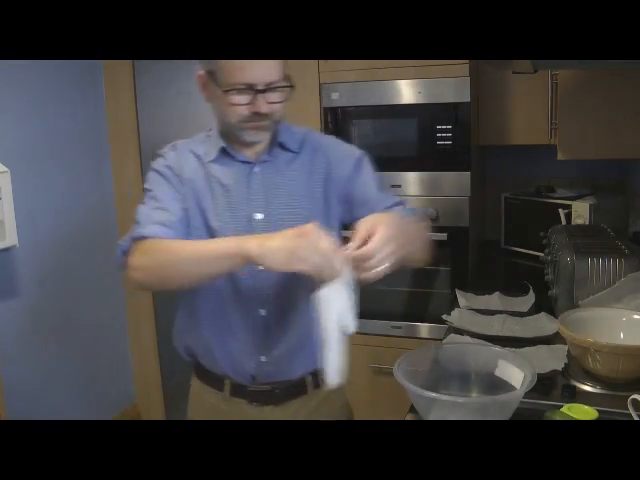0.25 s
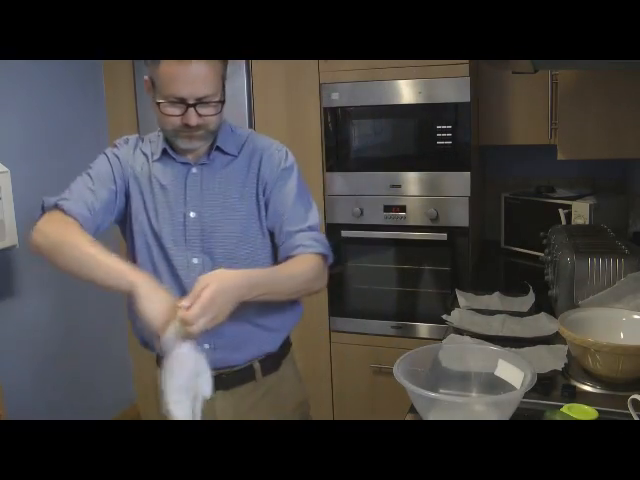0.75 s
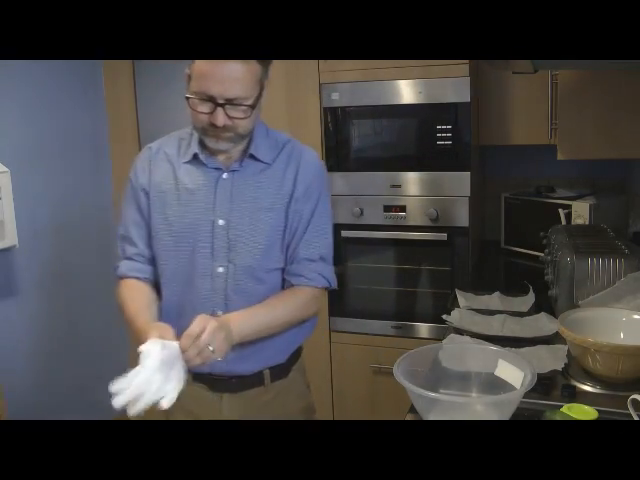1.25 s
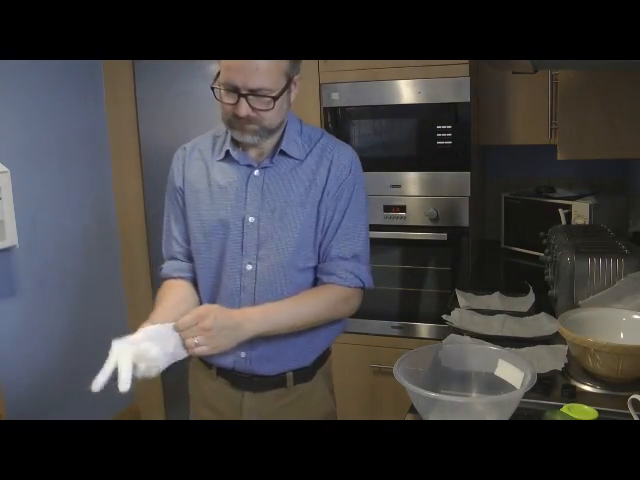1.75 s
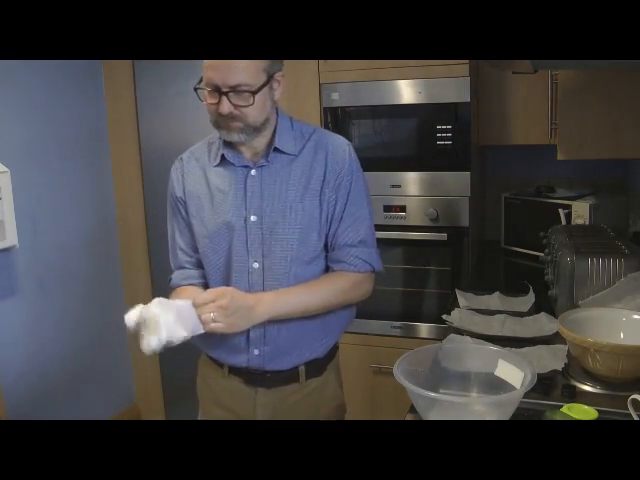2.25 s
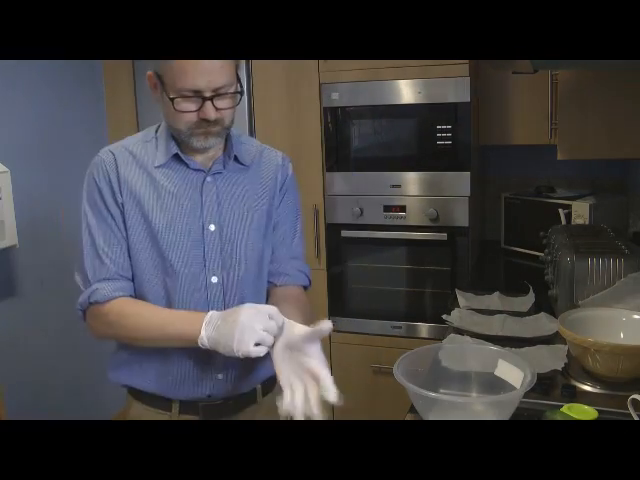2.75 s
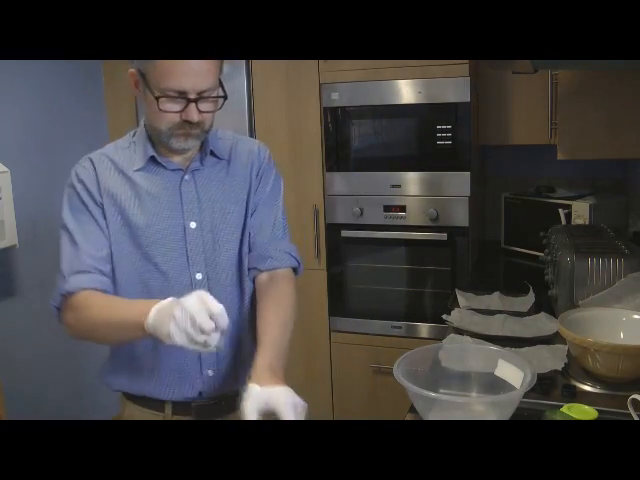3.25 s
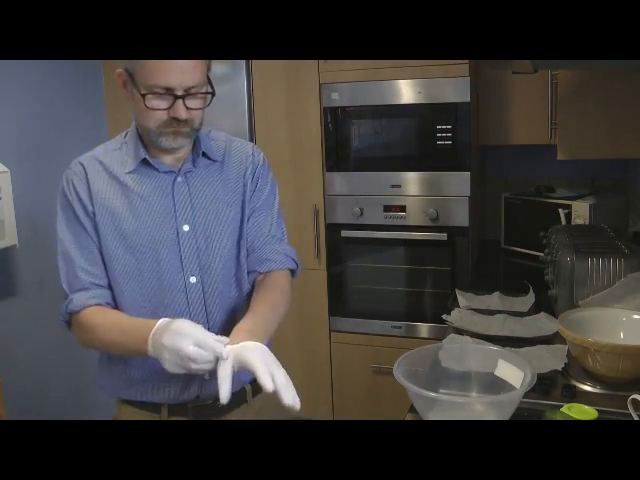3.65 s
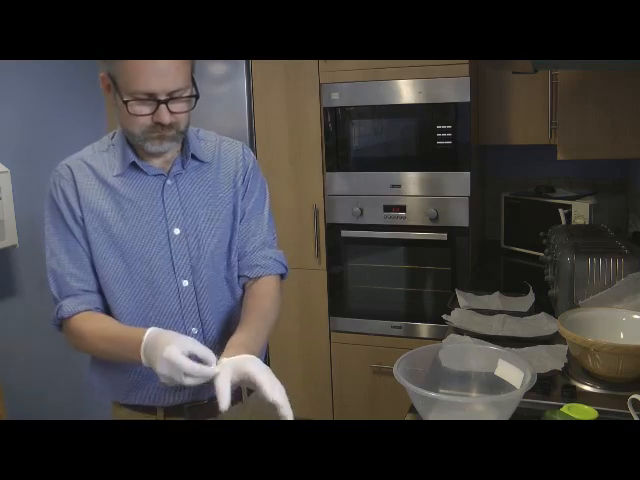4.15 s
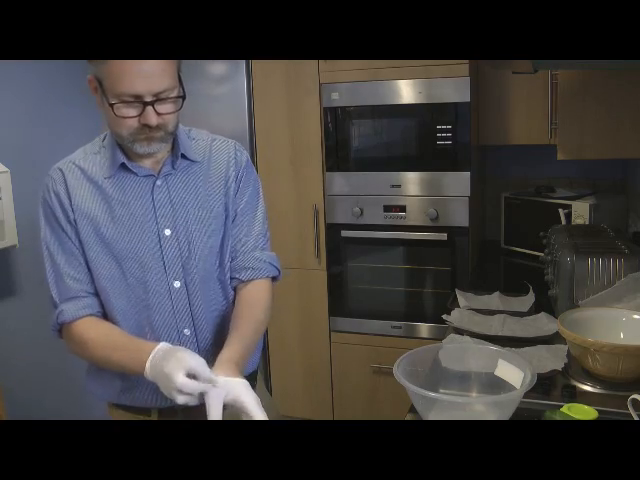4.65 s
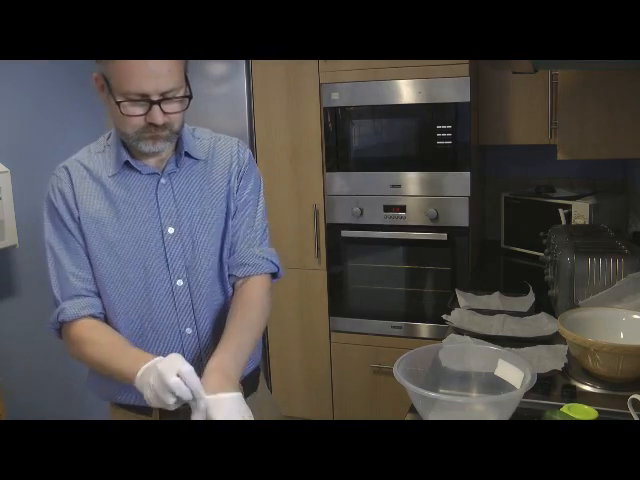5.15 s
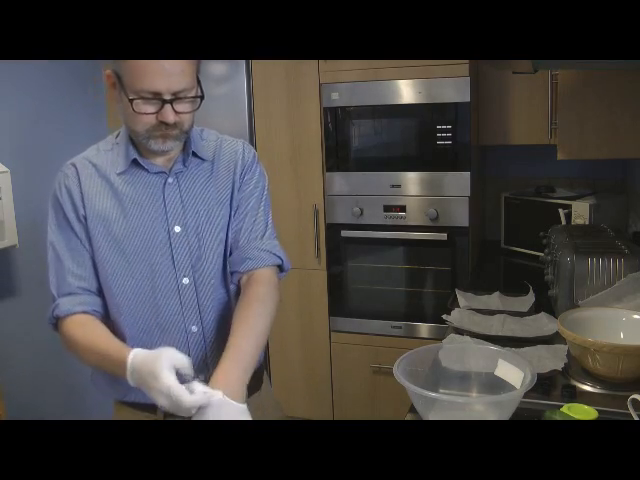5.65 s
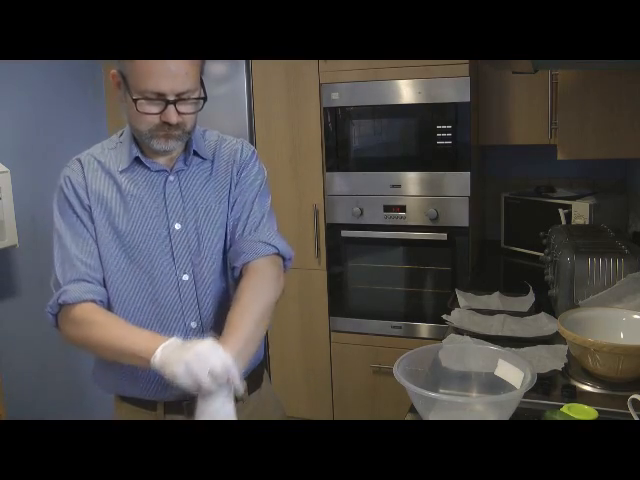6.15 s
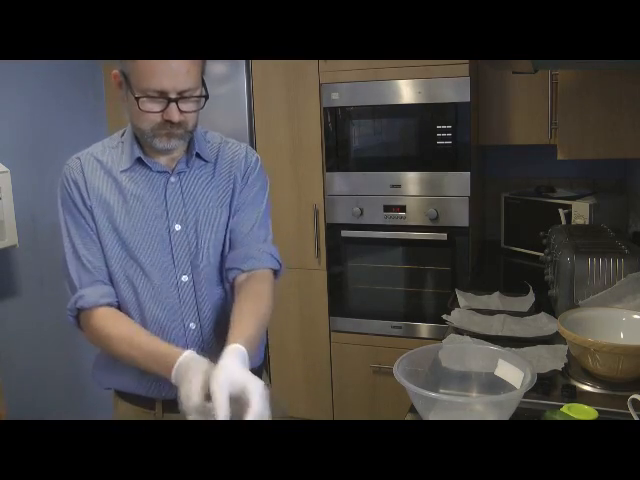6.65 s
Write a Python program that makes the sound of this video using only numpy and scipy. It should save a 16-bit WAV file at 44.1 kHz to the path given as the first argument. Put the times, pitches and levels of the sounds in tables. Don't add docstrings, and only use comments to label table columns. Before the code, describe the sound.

Thin latex gloves are tugged onto hands in a small hard kitchen, rustling and crackling with sharp snaps against the wrists over a faint fridge hum.

```python
import sys
import numpy as np
from scipy import signal
from scipy.io import wavfile
from scipy.ndimage import uniform_filter1d

SR = 44100
rng = np.random.default_rng(int(sys.argv[2]) if len(sys.argv) > 2 else 0)


def linear_from_db(decibels):
    return 10 ** (np.asarray(decibels, float) / 20)


def waveform_to_disk(signal):
    frames = np.transpose(np.atleast_2d(signal))
    scaled = np.clip(frames, -1, 1) * 32767
    samples = np.round(scaled).astype(np.int16)
    wavfile.write(sys.argv[1], SR, samples)


N = 303740


def evened(x):
    return x / np.sqrt(np.mean(x ** 2) + 1e-20)


def read_curve(points, hz):
    f, value = np.transpose(points)
    return np.interp(np.log(hz + 1), np.log(f + 1), value)


def add(mix, start_s, sound):
    part = mix[round(start_s * SR):][:len(sound)]
    part += sound[:len(part)]


def band(x, lo_hz, hi_hz):
    sos = signal.butter(3, [lo_hz, min(hi_hz, SR / 2.2)], "bandpass", fs=SR, output="sos")
    return signal.sosfilt(sos, x) / np.sqrt(2 * (hi_hz - lo_hz) / SR)


def ring(hz, width_hz):
    t = np.arange(3000) / SR
    x = t ** 2 * np.exp(-np.pi * width_hz * t) * np.sin(2 * np.pi * hz * t)
    return x / np.linalg.norm(x)


def fuzzy_tone(hz, width_hz):
    r = np.exp(-np.pi * width_hz / SR)
    noise = rng.standard_normal(N) + 1j * rng.standard_normal(N)
    slow = signal.lfilter([1 - r], [1, -r], noise)
    return evened((slow * np.exp(2j * np.pi * hz * np.arange(N) / SR)).real)


# freq_hz, density_db
FLOOR_SPECTRUM = [(24, -39), (40, -5.5), (108, -11), (234, 1.5), (286, -3), (494, -14), (573, -17.5),
                  (853, -18), (991, -20.5), (1990, -16.5), (3350, -22.5), (4630, -16), (8630, -29),
                  (14200, -31), (15300, -30)]
# freq_hz, correlation
FLOOR_LIKENESS = [(60, 0.34), (180, 0.77), (550, 0.41), (1650, 0.91), (4970, 1), (15000, 0.91)]


def floor():
    frames, hz = N // 256 + 5, np.fft.rfftfreq(1024, 1 / SR)
    a, b, c, d, patches_db = rng.standard_normal((frames, 513, 5)).T
    patches_db = evened(uniform_filter1d(uniform_filter1d(patches_db, 12, 0), 14, 1))
    same = np.clip(read_curve(FLOOR_LIKENESS, hz), -1, 1)[:, None]
    left = a + 1j * b
    right = same * left + np.sqrt(1 - same ** 2) * (c + 1j * d)
    z = np.array([left, right]) * linear_from_db(read_curve(FLOOR_SPECTRUM, hz)[:, None] + patches_db)
    return linear_from_db(-64.5) * evened(signal.istft(z, nperseg=1024, noverlap=768)[1][:, :N])


# pitch_hz, width_hz, level_db
FRIDGE_TONES = [(95.6, 9, -69), (198, 25, -75), (288, 30, -75), (124, 12, -75)]


def fridge():
    return sum(linear_from_db(level_db) * fuzzy_tone(hz, width_hz) for hz, width_hz, level_db in FRIDGE_TONES)


# start_s, pitch_hz, width_hz, level_db, t60_s
EARLIER_RUSTLE = [
    (0, 4380, 810, -53.5, 0.61),
    (2.71, 4330, 700, -59, 1),
]


def earlier_rustle():
    out, t = np.zeros(N), np.arange(N) / SR
    for start_s, hz, width_hz, level_db, t60_s in EARLIER_RUSTLE:
        add(out, start_s, linear_from_db(level_db - 60 * t / t60_s) * fuzzy_tone(hz, width_hz))
    return out


# time_s, left_height, right_height, length_ms
JOLTS_LR = [
    (1.077, -0.04, -0.011, 1.46),
    (3.207, 0.022, 0.0036, 3.6),
    (6.6581, -0.088, 0.05, 1.15),
]


def mic_jolts():
    out, t = np.zeros((2, N)), np.arange(N) / SR
    for time_s, left, right, length_ms in JOLTS_LR:
        out += np.outer([left, right], np.exp(-((t - time_s) / (length_ms / 1000)) ** 2))
    return signal.lfilter(*signal.butter(1, 7, "highpass", fs=SR), out)


# freq_hz, t60_s
EARLY_DECAY = [(250, 0.15), (1000, 0.13), (2500, 0.089), (5000, 0.074), (9000, 0.1), (15000, 0.032)]
# freq_hz, level_db
LATE_STRENGTH = [(1200, -15.5), (2550, -11), (3600, -10.5), (5100, -4.5), (8000, -13), (13000, -14.5)]


def tail():
    taps = np.zeros((2, SR // 2))
    slots = np.arange(200, SR // 2 - 12, 12)
    at = slots + rng.integers(0, 12, (2, len(slots)))
    np.put_along_axis(taps, at, rng.choice([-1., 1.], at.shape), 1)
    taps[1] = 0.75 * taps[0] + 0.57 * taps[1]
    hz, t, z = signal.stft(taps, SR, nperseg=256)
    fall_db = -60 * t / read_curve(EARLY_DECAY, hz)[:, None]
    late = linear_from_db(read_curve(LATE_STRENGTH, hz)[:, None] + fall_db / 3.28)
    out = signal.istft(z * (linear_from_db(fall_db) + late), SR, nperseg=256)[1]
    return out / np.linalg.norm(out[0])


# delay_ms, left_db, right_db
WALL_ECHOES = [(1.4, -3, -3.5), (3.6, -12.5, -13), (4.9, -11.5, -12.5)]


def kitchen(direct, spread, tails):
    n = len(spread)
    early = np.zeros((2, 300))
    for k, (delay_ms, left_db, right_db) in enumerate(WALL_ECHOES):
        early[:, round(delay_ms * SR / 1000)] += (-1) ** k * linear_from_db(np.array([left_db, right_db]))
    out = direct + linear_from_db(-4) * signal.oaconvolve(spread[None], early, axes=1)[:, :n]
    place = np.arange(n) / SR * 7.3 % 5
    for k, echo in enumerate(tails):
        away = np.minimum(abs(place - k), abs(place - k - 5))
        share = np.cos(np.pi / 2 * np.minimum(away, 1))
        out += linear_from_db(-2) * signal.fftconvolve((spread * share)[None], echo, axes=1)[:, :n]
    return linear_from_db(-4.5) * out


# start_s, level_db, pitch_hz, t60_s
FLESH_SLAPS = [(0.698, -41.5, 820, 0.015), (0.755, -52, 790, 0.048), (0.929, -37, 704, 0.04),
               (0.945, -41.5, 331, 0.044), (1.075, -41.5, 380, 0.0077), (1.675, -48, 667, 0.037),
               (1.801, -38, 354, 0.039), (1.745, -47, 780, 0.041), (1.918, -57, 530, 0.056),
               (2.52, -41, 470, 0.0067), (2.696, -43, 830, 0.017), (2.874, -56, 570, 0.047),
               (2.897, -47, 557, 0.009), (3.026, -44, 400, 0.027), (3.201, -36.5, 645, 0.023),
               (5.082, -39.5, 795, 0.042), (5.103, -32, 563, 0.032), (5.288, -50, 570, 0.04),
               (5.305, -36, 605, 0.033), (5.749, -51.5, 350, 0.019), (5.939, -46.5, 562, 0.051),
               (6.07, -32, 810, 0.013), (6.16, -57, 312, 0.064), (6.407, -51, 534, 0.037),
               (6.458, -52, 343, 0.051), (6.475, -44.5, 534, 0.021), (6.579, -52, 304, 0.02),
               (6.654, -31, 528, 0.016)]


def slaps():
    out = np.zeros(N)
    thud, pat = ring(378, 380), ring(2225, 1900)
    body = linear_from_db(-5.5) * thud / thud.max() + linear_from_db(10.5) * pat / pat.max()
    for start_s, level_db, hz, t60_s in FLESH_SLAPS:
        knock = ring(hz, 6 / max(t60_s, .01))
        add(out, start_s, linear_from_db(level_db - 0.5) * (knock / knock.max() + body))
    return out


# start_s, crack_db, pocket_db, pocket_hz, sizzle_db; pocket, sizzle re crack
TAUT_CRACKS = [(0.6994, -31, -11, 2820, -12.5), (0.756, -40, -13, 1940, -14),
               (0.9283, -15.5, -14, 2560, -11.5), (1.0761, -18, -12.5, 2720, -18.5),
               (1.0762, -10, -24.5, 3370, -14), (1.675, -19, -16, 1750, -19),
               (1.6828, -26.5, -10, 3370, -9), (1.7773, -31.5, -7.5, 2260, -15),
               (1.8027, -30, -3.5, 4060, -13), (2.6961, -29.5, -15, 3340, -23),
               (2.8967, -33.5, -17.5, 1800, -9), (3.2031, -11.5, -13, 2580, -11.5),
               (3.846, -39.5, -18, 3350, -24), (5.086, -30, -5, 2610, -17),
               (5.104, -19, -13.5, 2600, -16.5), (5.195, -33, -14, 3620, -15.5),
               (5.7525, -22.5, -13.5, 3080, -3), (5.9353, -34.5, -24, 2480, -21),
               (6.0072, -31.5, -10.5, 2720, -31), (6.071, -22.5, -1.5, 3010, -9.5),
               (6.2055, -36, -9, 2730, -18), (6.4098, -28.5, -18, 2600, -18),
               (6.6545, -15.5, -4, 2600, -11.5)]
SKIN_PEELS = [(0.5011, -43, -11.5, 2300, -10.5), (0.616, -43.5, -3, 2960, -9), (0.844, -40, -13, 2740, -17),
              (0.8561, -30, -8, 2690, -16), (2.085, -35, -9.5, 2640, -18), (2.5154, -33, -9, 2400, -20),
              (2.8744, -39.5, -9, 2430, -18), (3.0177, -29, -20.5, 2060, -10),
              (3.197, -23.5, -13, 2530, -17), (3.685, -40.5, -18, 3100, -11),
              (4.6688, -35.5, -14.5, 2700, -16.5), (5.29, -34, -2.5, 2660, -20),
              (5.3053, -22.5, -8, 4300, -16.5), (5.454, -40, -9, 2920, -28), (5.5717, -42.5, -15, 3490, -4),
              (5.9468, -36, -6, 3260, -26), (6.0547, -35, -16, 2310, -11), (6.227, -33, -34, 3200, -13.5),
              (6.4638, -33.5, -17, 2900, -13.5), (6.583, -25.5, -28.5, 2190, -25)]
FINGER_STRIPS = [(1.744, -36.5, -10, 2100, -16), (1.9202, -39.5, -10.5, 1700, -16),
                 (1.956, -29.5, -17, 3670, -12), (4.6328, -45, -20, 2710, -19), (1.015, -50, -6, 2800, -18),
                 (1.151, -48, -21, 3000, -18), (3.301, -52.5, -9, 2600, -14), (3.384, -51, -7.5, 3140, -18),
                 (5.38, -48, -7, 4400, -22), (6.7, -52, -2.5, 2480, -22), (6.318, -33.5, -36, 3300, -8)]
# start_s, crack_db, sizzle_db
FAINT_CREASES = [(0.239, -53, -25), (0.256, -45.5, -24), (0.3505, -54, -8), (0.5671, -64, -12),
                 (0.6068, -43, -21), (0.7965, -40, -31), (1.4207, -51.5, -39), (1.5583, -50, -11),
                 (1.6087, -44, -15), (1.638, -46, -25), (2.2647, -42.5, -23), (2.2866, -42.5, -18),
                 (2.3116, -43, -19), (2.3431, -45.5, -27), (2.3755, -44, -34), (2.486, -45, -28),
                 (2.6642, -47, -29), (2.6813, -52, -20), (2.7427, -48, -8), (3.1565, -44.5, -12),
                 (3.526, -49, -22), (3.739, -50.5, -28), (4.166, -49, -7.5), (5.025, -44.5, -31),
                 (5.4927, -44, -11), (5.5117, -47, -26), (5.6038, -41.5, -12), (6.2674, -44, -22),
                 (6.489, -55, 7), (6.794, -58, -27)]
# start_s, crack_db, sizzle_db
FAINT_TICKS = [(0.4083, -51, -7), (0.9674, -49, 2), (2.0594, -43.5, -17), (2.18, -52, -20),
               (2.9946, -39.5, -14), (3.514, -45.5, -20), (3.549, -46.5, -20), (3.674, -45, -19),
               (3.934, -48, -25), (3.9815, -52, -19), (4.2308, -50, -16), (4.2794, -56, -15),
               (4.356, -56, -22), (4.386, -46.5, -19), (4.5431, -48.5, -26), (4.559, -47, -25),
               (4.873, -43, -17), (4.8992, -41, -16), (5.004, -48, -18), (5.2144, -43, -27),
               (5.3394, -45, -8), (5.7317, -44, -35), (5.88, -47, -24), (5.9744, -42, -24),
               (6.1844, -43, -18)]


def releases():
    out = []
    for table, length_ms in [(TAUT_CRACKS, 3.1), (SKIN_PEELS, 6), (FINGER_STRIPS, 14)]:
        out += [(*row, length_ms) for row in table]
    for table, pocket_db, length_ms in [(FAINT_CREASES, -9.5, 4.1), (FAINT_TICKS, -21.5, 6)]:
        for start_s, crack_db, sizzle_db in table:
            pocket_hz = 2600 + 500 * rng.uniform(-1.4, 1)
            out.append((start_s, crack_db, pocket_db, pocket_hz, sizzle_db, length_ms))
    return out


# low_hz, high_hz, level_db
GLOVE_PARTS = [
    (3890, 6930, -1.5),
    (1634, 3550, 1),
    (7750, 14000, 4),
    (305, 857, -1),
]
# time_s, pull_db, slack_db; slack film sounds hollow, not crisp
FINGER_PULL = [(0.0, -75.5, 4.5), (0.4, -60, -4.5), (0.7, -74, 8), (0.9, -58.5, 4), (1.3, -69, -4.5),
               (1.5, -77.5, 4.5), (1.63, -51.5, -5), (1.76, -58.5, 12.5), (2.04, -61, 4), (3.4, -67.5, -3),
               (3.5, -79, 3.5), (4.1, -87.5, 5.5), (4.6, -75, 0), (5.2, -63.5, 8.5), (5.43, -57, -1),
               (5.8, -69.5, 4), (6.0, -56, 1), (6.89, -59, -2.7)]
# rest_db, pull_share, slack_share, settle_db
PART_ANSWER = [
    (-62.5, 0.8, 0.009, -37.5),
    (-63, 0.82, 0.74, -31),
    (-73, 0.82, 0.12, -41),
    (-68, 0.42, 0.93, -51),
]


def effort():
    rest_pull_db, settle_s = -62, 0.059
    time_s, pull_db, slack_db = np.transpose(FINGER_PULL)
    t, kicks = np.arange(N) / SR, np.zeros((4, N))
    pull_db = np.interp(t, time_s, pull_db) - rest_pull_db
    slack_db = np.interp(t, time_s, slack_db)
    for start_s, crack_db, pocket_db, _, sizzle_db in TAUT_CRACKS + SKIN_PEELS + FINGER_STRIPS:
        part_db = crack_db + np.array([0, pocket_db, sizzle_db, pocket_db])
        kicks[:, round(start_s * SR)] += linear_from_db(2 * part_db)
    creep = signal.lfilter([1], [1, -np.exp(-1 / (settle_s * SR))], kicks)
    force = []
    for (rest_db, pull_share, slack_share, settle_db), after in zip(PART_ANSWER, creep):
        pull_power = linear_from_db(2 * (rest_db + pull_share * pull_db + slack_share * slack_db))
        force.append(np.sqrt(pull_power + linear_from_db(2 * settle_db) * after))
    return np.array(force)


def drag():
    clumps = evened(uniform_filter1d(uniform_filter1d(rng.standard_normal(N), 400), 400))
    size_db = 3.8 * np.minimum(rng.exponential(1, N), 4)
    slips = (rng.random(N) < .15) * rng.choice([-1., 1.], N) * linear_from_db(size_db)
    force = effort() * evened(slips * linear_from_db(3.2 * clumps))
    return sum(linear_from_db(db) * band(f, lo_hz, hi_hz) for f, (lo_hz, hi_hz, db) in zip(force, GLOVE_PARTS))


def snaps():
    film, sizzle, pocket = np.zeros((3, 2, N))
    t = np.arange(2000) / SR
    for start_s, crack_db, pocket_db, pocket_hz, sizzle_db, length_ms in releases():
        chance, size = rng.random(2000), rng.standard_normal(2000)
        u = t / (length_ms / 1000)
        slips = (chance < .2) * size * (1 - np.exp(-7 * u)) * np.exp(-u)
        slips[0] = 6 / length_ms
        slips *= linear_from_db(crack_db + 14) / np.linalg.norm(slips[:200])
        lump = np.zeros(2000)
        lump[round(min(length_ms, 20) * SR / 2000)] = np.linalg.norm(slips)
        air = ring(pocket_hz, 1068 - 75 * pocket_db)[:300]
        for k, push in enumerate([slips, lump]):
            add(film[k], start_s, linear_from_db(-1.5) * push)
            add(sizzle[k], start_s, linear_from_db(sizzle_db + 6.5) * push)
            add(pocket[k], start_s, linear_from_db(pocket_db + 11) * signal.fftconvolve(push, air))
    return band(film, *GLOVE_PARTS[0][:2]) + band(sizzle, *GLOVE_PARTS[2][:2]) + pocket


def gloves():
    return slaps() + drag() + snaps()


LEVEL_DIPS_S = [2.7055, 6.785]


def scene():
    background = floor() + fridge() + earlier_rustle() + mic_jolts()
    hands, tails = gloves(), [tail() for k in range(5)]
    change = round(LEVEL_DIPS_S[0] * SR)
    room = np.hstack([kitchen(*hands[:, :change], tails), kitchen(*hands[:, change:], tails)])
    return room * linear_from_db(np.array([[-.6], [.6]])) + background


def band_limit(x):
    return signal.sosfilt(signal.butter(12, 16620, fs=SR, output="sos"), x)


def record(dry):
    t = np.arange(N) / SR
    dips = [np.clip(abs(t - time_s) / .004, .08, 1) for time_s in LEVEL_DIPS_S]
    faded = dry * np.prod(dips, axis=0)
    dull = signal.firwin(255, 15700, window=("kaiser", 3), fs=SR)
    mix = signal.oaconvolve(faded, dull[None], "same", axes=1)
    return band_limit(mix)


dry = scene()
out = record(dry)
waveform_to_disk(out)
```